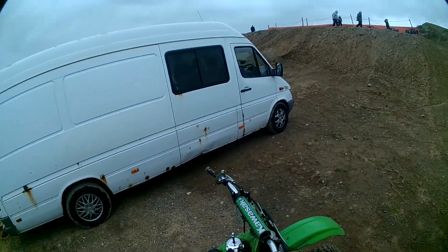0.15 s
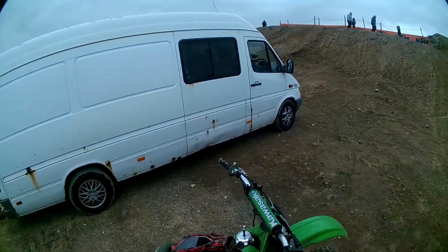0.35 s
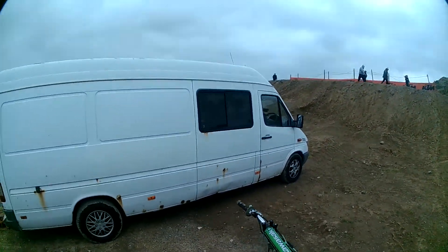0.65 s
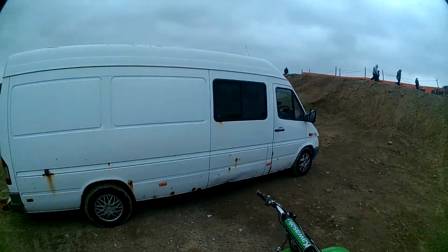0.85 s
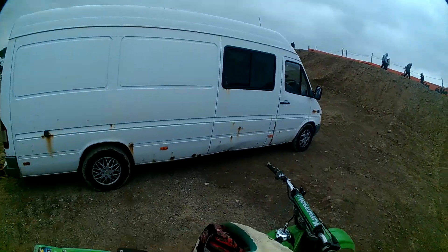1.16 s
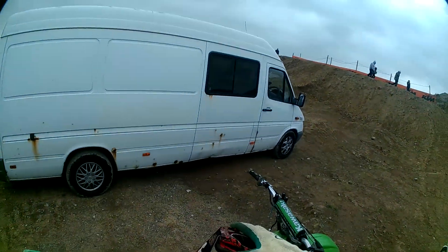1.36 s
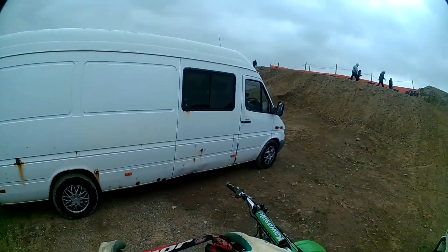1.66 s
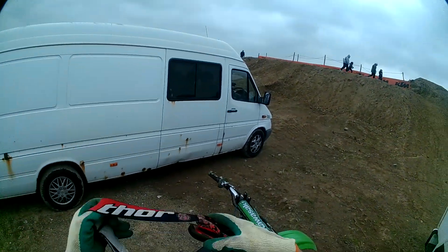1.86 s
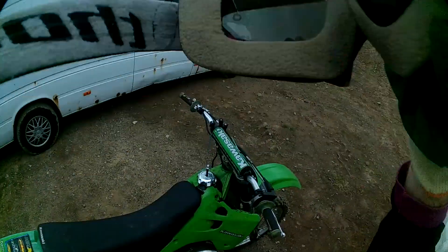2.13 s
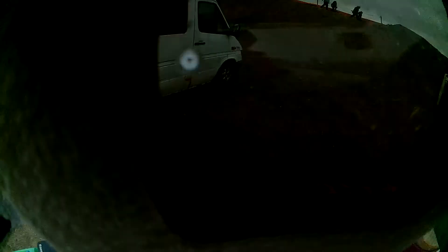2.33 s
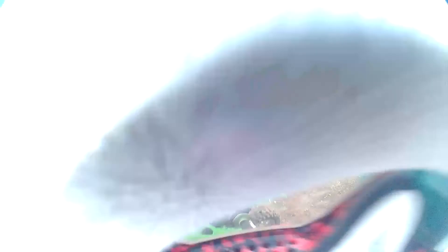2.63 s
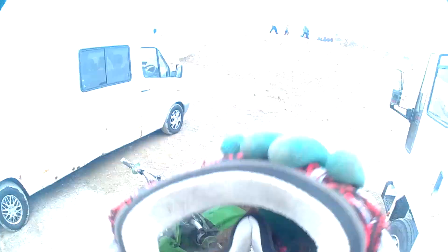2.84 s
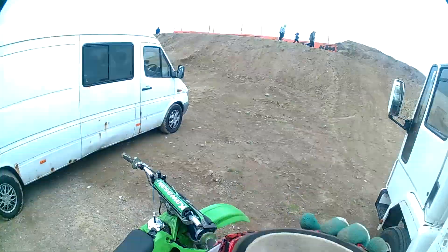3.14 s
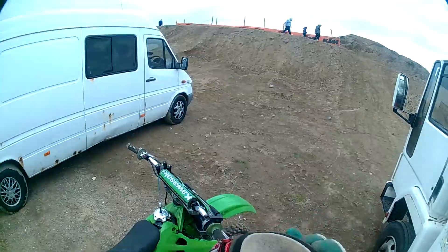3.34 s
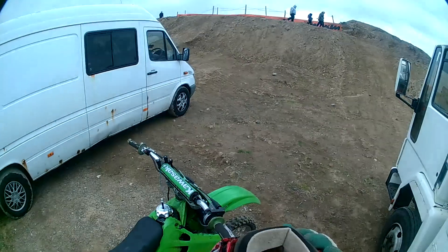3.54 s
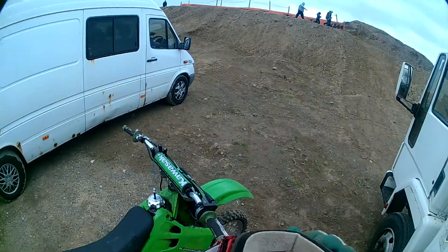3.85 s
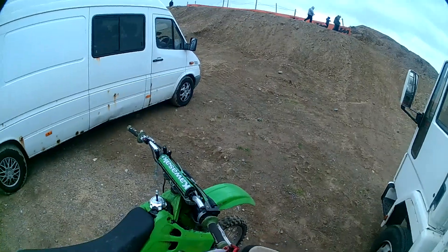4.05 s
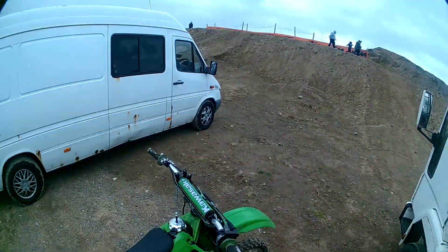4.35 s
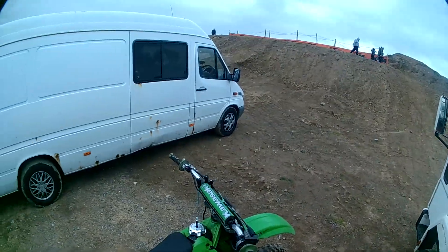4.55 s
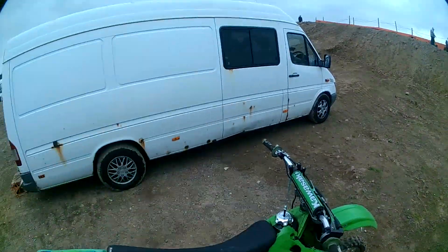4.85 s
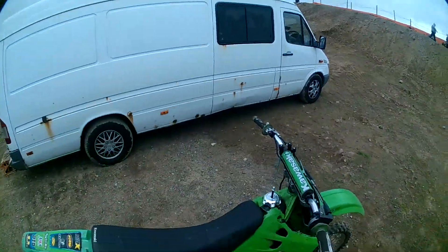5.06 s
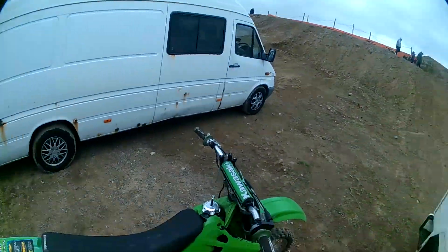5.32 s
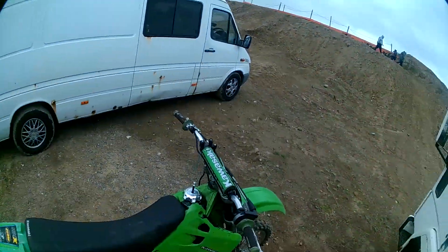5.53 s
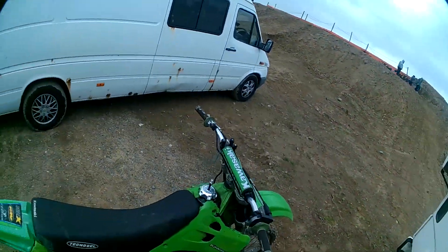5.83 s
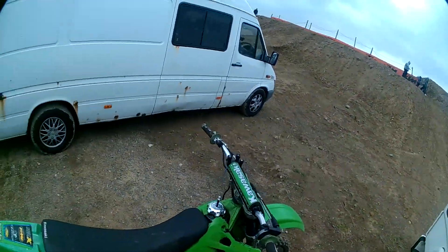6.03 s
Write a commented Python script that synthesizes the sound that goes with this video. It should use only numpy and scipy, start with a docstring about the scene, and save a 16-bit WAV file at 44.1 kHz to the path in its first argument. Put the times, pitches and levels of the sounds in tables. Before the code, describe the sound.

Goggles and gloves knock, rub and squeak against a helmet, close and muffled through a plastic camera case, over a faint breeze.

```python
"""Helmet camera on a quiet hillside

The microphone sits sealed in a plastic case on a helmet. Right at the case, gloves, a strap and
goggles knock, rub and squeak on the shell; the sound comes through the plastic and rings its modes.
Jolts sway the helmet with a low hum. Breeze and a few far chirps lie faintly behind, the air
muffled by the case. The sound cuts out for a few milliseconds under one heavy blow."""
import sys
import numpy as np
from scipy import signal
from scipy.fft import rfft, irfft, next_fast_len
from scipy.io import wavfile
from scipy.ndimage import uniform_filter1d, minimum_filter1d

SR = 44100
rng = np.random.default_rng(int(sys.argv[2]) if len(sys.argv) > 2 else 0)


def waveform_to_disk(signal):
    """Save audio, clipped to [-1, 1], as 16-bit WAV at the path in sys.argv[1]."""
    frames = np.transpose(np.atleast_2d(signal))
    scaled = np.clip(frames, -1, 1) * 32767
    samples = np.round(scaled).astype(np.int16)
    wavfile.write(sys.argv[1], SR, samples)


N = 272979

# modes of shell and case: f/Hz, relative level/dB, t60/s
SHELL_MODES = [(51.1, 11, 0.36), (80, -5.5, 0.11), (101, 1, 0.65), (232, -3, 0.36), (276.9, 6.5, 0.15),
               (332, 13.5, 0.07), (425, -1, 0.12), (483, -3, 0.13), (524, 0.5, 0.075), (733, -4.5, 0.059),
               (848.4, 6, 0.018), (1013, -8, 0.079), (1205, -3, .03), (1390, 9, 0.022), (1500, 8, 0.024),
               (1700, 5, 0.023), (1810, 3, 0.035), (1922, 7.5, 0.023), (2000, -21.5, 0.0092),
               (2596, 14, 0.017), (2970, 3, 0.013), (3474, 8.5, .015), (3720, 11, 0.021),
               (4130, -1.5, 0.027), (4760, -2, 0.01), (6160, -6, 0.02), (8100, -4.5, 0.01), (8650, 2, 0.01),
               (9200, -10, 0.0081), (9400, 6, 0.0085), (10400, 6, 0.006), (13200, -14, 0.0055)]
# edges of the six mode families (helmet sway, boom, body, ring, edge, case tick): f/Hz
FAMILY_EDGES_HZ = [35, 150, 600, 1250, 2350, 4900, 14500]
# blows on the shell: t/s, ring peak/dB, two favoured pitches f/Hz, boom, body and edge/dB re ring,
# contact/ms, damping by the hand/factor on the decay rate
KNOCKS = [(1.865, -33, 870, 1390, -12.5, -3, -30, 6.1, 0.94),
          (1.881, -30.5, 232, 1410, -10.5, -6, -44, 5.2, 0.76),
          (1.915, -44.5, 1010, 1480, -0.5, 7.5, -33.5, 1.66, 0.86),
          (1.931, -32.5, 826, 1360, -20, -6, -30.5, 3.6, 0.93),
          (1.946, -40.5, 1250, 1440, -17, -10, -36, 7.1, 1.1),
          (2.062, -52, 1220, 1360, -7, -6, -29, 3.5, 1.1), (2.152, -18, 1200, 1400, -20, -9, -15, 6.1, 2.3),
          (2.163, -24, 969, 1390, -31, -35, -36, 2.1, 1.05),
          (2.192, -33.5, 1000, 1390, -24, -15, -25, 3.3, 0.54),
          (2.338, -39.5, 705, 1460, -21, -0.5, -26, 3.1, 0.58),
          (2.4, -45, 729, 1330, -30, -6, -40, 1.25, 1.1), (2.574, -39, 1000, 273, -1.5, 1, -24, 5.5, 1.2),
          (2.604, -43.5, 734, 1500, -27, 2.5, -27.5, 3, 0.53),
          (2.889, -37, 890, 1420, -9, -4.5, -31, 2.5, 0.58),
          (2.898, -38, 800, 1440, -6.5, -1, -16.5, 5.2, 1),
          (3.106, -41.5, 840, 1940, -33, 2.5, -30, 5.1, 0.35),
          (3.124, -31.5, 845, 1960, -19, 8.5, -36, 5.6, 0.28),
          (3.142, -44, 853, 2000, -7, -4, -29, 2.8, .8), (3.173, -36, 870, 1880, -19, 1, -34, 3.8, 0.52),
          (3.253, -65, 724, 2000, 12.5, 19, -2, 2, 0.46), (3.631, -41, 799, 1930, -33, 5, -27, 0.91, 1.2),
          (3.656, -48.5, 990, 1700, -26, -22, -10, 2.3, 1.2),
          (3.835, -35.5, 840, 1960, -22, -6.5, -33, 5.7, 0.5),
          (3.867, -34, 960, 1980, -38, -27, -30, 4.2, 1.7),
          (3.884, -13.5, 700, 1990, -35.5, 3, -20, 4.1, 2.4),
          (3.957, -20.5, 869, 1460, -14, -3.5, -30, 2.6, 0.91),
          (3.971, -26, 767, 1810, -17, -7.5, -22, 3.6, 2.4),
          (3.974, -18.5, 810, 1380, -19.5, -0.5, -27, 1.1, 2),
          (3.982, -51, 516, 1600, 27, 19, -32, 2, 3.63), (3.989, -39.5, 660, 1370, -1, 19, -28, 1.45, 2.2),
          (3.997, -46.5, 660, 537, 6, 20, -34, 1.6, 1.9), (4.038, -31.5, 734, 1920, -24, 1, -35, 2.6, .55),
          (4.115, -43, 727, 1810, -3.5, 1.5, -26, 3.2, 1.3),
          (4.186, -36.5, 770, 1370, -9, 3.5, -35.5, 5.9, 1.5),
          (4.223, -41, 810, 1360, -41, 9.5, -33, 2.8, 0.61),
          (4.235, -37, 760, 1310, -22, -3.5, -32, 2.4, 0.36),
          (4.267, -30, 772, 1330, -40, 3.5, -43, 3.3, 1.26), (4.286, -41, 736, 1460, -18, 3.5, -19, 1.3, 1),
          (4.322, -20.5, 1210, 1350, -22, -10.5, -29.5, 2.5, 0.95),
          (4.337, -28, 1260, 1410, -41, -7.5, -29.5, 4.3, 1.7),
          (4.558, -41.5, 758, 1890, -7.5, 2, -24.5, 3.6, 0.72),
          (4.77, -41.5, 1000, 1610, -18, -3, -41, 10.5, 1.8),
          (4.808, -21.5, 940, 1650, -21, -4, -27.5, 2.1, 0.96),
          (4.846, -37.5, 740, 1900, -6.5, 0, -21, 5.7, 2.5), (4.872, -46.5, 668, 1480, 1, 5, -31, 3.3, 2.1),
          (5.106, -35.5, 708, 1470, -35, -15.5, -28, 3.9, 1.2),
          (5.165, -18, 790, 1400, -18, -4, -23, 3.8, 1.2),
          (5.185, -29.5, 880, 1980, -22, -3.5, -30, 2.7, 1.5),
          (5.449, -43.5, 1090, 1710, -19, -23, -46, 1.4, 1.2),
          (5.674, -44, 1010, 1500, -32, 0.5, -27, 2.7, 1.3),
          (5.846, -32, 1070, 1520, -29, -17, -32, 3.9, 1.1),
          (5.866, -37.5, 729, 1530, -14, -12, -24, 4.6, 0.91),
          (5.902, -37.5, 1250, 1330, -17, -7, -31, 2.6, 1.9),
          (5.931, -9, 991, 1700, -40, -16.5, -26.5, 3.65, 1.3),
          (5.95, -21, 1010, 1740, -32, -5, -26, 4.1, 1.6),
          (5.972, -22, 1014, 1390, -23.5, -4, -15, 3.4, 0.99),
          (6.042, -36, 1020, 1500, -10, 3.5, -28, 1.8, 0.98),
          (6.153, -20.5, 960, 1420, -17, -6, -18.5, 4, 1.2)]
# the glove scraping off after a knock: boom, body, ring and edge rms/dB re that family's peak
SCRAPE_OFF_DB = [-11.5, -23.5, -25, -26.5]
# glove and strap strokes: full from t/s, hold/s, rise/s, fall/s, ring rms/dB,
# boom, body and edge/dB re ring
STROKES = [(1.884, 0.067, 0.029, 0.054, -54.5, -1.5, 0, -25.5),
           (2.033, 0.012, 0.051, .12, -69.5, -0.5, -15, -29),
           (2.188, 0.046, 0.018, .06, -48, -17, -3, -13.5),
           (2.333, 0.0075, 0.14, .12, -56.5, -6.5, -0.5, -13.5),
           (2.397, 0.046, 0.11, .06, -58.5, -11, -1.5, -9.5),
           (2.524, 0.059, .08, .15, -48.5, -11.5, -9, -29), (2.602, 0.083, 0.12, .09, -59.5, -3, -9, -9),
           (2.674, 0.11, 0.037, .06, -41.5, -27.5, -5.5, -25),
           (2.797, .04, 0.043, 0.078, -38.5, -20, -13, -19.5),
           (2.927, 0.091, 0.14, .09, -53, -19, -5, -21.5), (3.092, 0.065, 0.036, .12, -49.5, -5.5, -2, -21),
           (3.219, 0.049, .09, .14, -57.5, -9, -6.5, -19), (3.418, 0.012, 0.13, .05, -65.5, -11, 0.5, -22),
           (3.478, .025, .04, .045, -66.5, -2.5, 2, -25), (3.582, 0.059, 0.041, .09, -51.5, -13, -7, -22),
           (3.763, 0.034, 0.088, .09, -56.5, -4, -2.5, -26),
           (3.834, 0.042, 0.026, .09, -38.5, -21.5, -19, -26),
           (3.894, 0.047, 0.026, .08, -42.5, -11.5, -1.5, -21),
           (4.025, 0.017, 0.013, .11, -44, -7.5, -1, -21.5),
           (4.226, 0.0059, 0.091, .09, -44.5, -17, -0.5, -20.5),
           (4.294, 0.049, .05, .05, -70, 8, 18.5, -32), (4.451, 0.11, 0.096, .07, -56.5, -13.5, -0.5, -23),
           (4.643, .14, 0.046, .09, -64.5, -8, 1, -24.5), (4.813, 0.005, 0.028, .12, -42.5, -17, 0, -23),
           (5.007, 0.065, 0.063, .09, -53, -4.5, 2.5, -23.5),
           (5.109, 0.07, 0.11, .08, -43.5, -15, -3, -17.5), (5.248, 0.1, 0.13, .09, -60, -9, -6.5, -16.5),
           (5.443, .01, 0.11, .15, -58.5, -14.5, -6, -20),
           (5.52, 0.17, 0.063, .09, -59.5, -11.5, -6, -21.5), (5.85, .01, 0.09, .09, -54, -18, -5.5, -15.5),
           (5.904, 0.074, 0.073, .06, -47, -3, -9.5, -16), (6.114, 0.073, 0.11, .05, -60.5, -10, -7, -20.5),
           (6.163, 0.011, 0.04, .09, -56, 2, 2, -25)]
# jolts that sway the whole helmet: t/s, rise/s, fall/s, rms level/dB
JOLTS = [(1.885, .015, 0.2, -61), (2.18, .03, 0.065, -64.5), (2.59, 0.13, .25, -79.5),
         (2.872, .2, 0.18, -76), (3.13, 0.14, .08, -76.5), (3.59, .02, 0.19, -62.5), (3.89, .09, .09, -77),
         (3.983, .006, .03, -55), (4.03, .05, 0.16, -63.5), (4.33, .09, .07, -74),
         (4.59, 0.25, 0.11, -77.5), (4.83, 0.062, 0.18, -61.5), (5.17, 0.081, .07, -71),
         (5.35, .2, 0.22, -77.5), (5.57, 0.12, 0.36, -74.5), (5.97, .15, 0.15, -73),
         (6.17, 0.069, 0.18, -68)]
# cloth ticking over the case itself: full from t/s, hold/s, rms level/dB
CASE_DRAGS = [(2.202, .05, -92.5), (2.29, .06, -101), (2.38, 0.083, -94), (2.751, 0.061, -92.5),
              (3.9, .02, -95), (4.042, .04, -94), (4.204, .05, -107), (5.09, .11, -101)]
# short slips of a glove: t/s, length/s, first f/Hz, last f/Hz, level/dB
SQUEAKS = [(3.588, 0.021, 1980, 1900, -42), (3.608, 0.012, 1840, 1700, -52),
           (3.616, 0.017, 1536, 1485, -39), (3.624, 0.024, 2010, 1860, -47.5),
           (3.638, 0.041, 1700, 1773, -47.5), (3.675, .016, 1820, 1910, -47), (4.981, .05, 761, 755, -54),
           (5.038, .03, 748, 730, -39), (5.065, .05, 735, 718, -52.5)]
# far chirps: t/s, f/Hz, peak level/dB, length/ms
CHIRPS = [(.768, 2880, -87, 16), (.803, 2880, -87, 16), (1.268, 2900, -86, 15), (1.301, 2900, -89, 14),
          (1.395, 1305, -61, 32), (1.448, 1330, -63.5, 27), (1.488, 1380, -60.5, 20)]
# outside air as heard within the case: f/Hz, relative spectral level/dB
AIR_SPECTRUM = [(30, -32), (100, -23), (250, -13.5), (450, -7), (750, -0.5), (1250, -4), (1700, -12.5),
                (2500, -27.5), (4000, -42.5), (5500, -57.5)]
# gaps in the sound under a heavy blow: start t/s, end t/s
DROPOUTS = [(3.9805, 3.9832), (3.9862, 3.9897), (3.9957, 3.997)]

TREBLE_CUT_HZ, MUFFLE_HZ = 4880, 3900
TREBLE_CUT = np.vstack([signal.ellip(6, .5, 45, TREBLE_CUT_HZ, fs=SR, output="sos"),
                        signal.butter(6, MUFFLE_HZ, fs=SR, output="sos")])


def knocks(focus_db=11, focus_width=0.077, detune=0.014, scatter_db=1.0,
           thump_db=-32, thump_ms=.8, tick_db=-22):
    """Each blow is a push and a short rattling contact; modes near two pitches of the spot ring most."""
    out, t = np.zeros(N + SR), np.arange(SR // 12) / SR
    hz, db, t60 = np.array(SHELL_MODES).T
    family = np.searchsorted(FAMILY_EDGES_HZ, hz) - 1
    push_age = t * 1000 / thump_ms
    push = (np.e * push_age / 2) ** 2 * np.exp(-push_age) * (1 - push_age / 6.1)
    for start, peak_db, first_hz, second_hz, boom_db, body_db, edge_db, contact_ms, damping in KNOCKS:
        span = slice(int(start * SR), int(start * SR) + len(t))
        mistuning, scatter = rng.standard_normal((2, len(hz)))
        pitch = hz * (1 + detune * mistuning)
        nearness = sum(np.exp(-(np.log(hz / spot) / focus_width) ** 2) for spot in (first_hz, second_hz))
        gain = undb(db + scatter_db * scatter + focus_db * nearness)
        decay = np.exp(-np.log(1000) * max(damping, .4) * t / t60[:, None])
        modes = gain[:, None] * np.sin(2 * np.pi * np.outer(pitch, t)) * decay
        contact_age = np.arange(1024) / (contact_ms * SR / 1000)
        contact = rng.standard_normal(1024) * np.sqrt(contact_age) * np.exp(-2 * contact_age ** 2)
        out[span] += np.sign(mistuning[0]) * push * undb(peak_db + thump_db)  # random polarity
        # the sharper the edge of a knock, the more the case ticks
        for k, share_db in enumerate([boom_db, body_db, 0, edge_db, edge_db + tick_db], 1):
            struck = signal.fftconvolve(modes[family == k].sum(axis=0), contact)[:len(t)]
            heard = family_band(struck, k)
            out[span] += heard / np.abs(heard).max() * undb(peak_db + share_db)
    return out[:N]


def rubbing(slips_per_s=2400, scatter_db=0.98, friction_noise=0.63, burst_db=2.0, wander_db=2.5,
            shell_damping=1.13, tick_damping=1.8):
    """Cloth and foam stick and slip on the shell: dense soft clicks in bursts; the spot rubbed wanders."""
    slipping = rng.random(N) < slips_per_s / SR
    slips = slipping * undb(scatter_db * rng.exponential(size=N)) * rng.standard_normal(N)
    force = at_level(slips, 0) + friction_noise * rng.standard_normal(N)
    force *= undb(burst_db * wander(60))
    families = np.zeros((6, N))
    for hz, db, t60 in SHELL_MODES:
        k = np.searchsorted(FAMILY_EDGES_HZ, hz) - 1
        if k > 0:
            damping = shell_damping if hz < TREBLE_CUT_HZ else tick_damping  # from the pressing hand
            drive = force * undb(wander_db * wander(30))
            families[k] += at_level(ring_mode(drive, hz, t60 / damping), db)
    return sum(at_level(family_band(families[k], k), 0) * gain
               for k, gain in enumerate(rubbing_pressure(), 1))


def rubbing_pressure(scrape_fall_s=.035, drag_fade_s=.04):
    """Rms gains from boom to tick: strokes and scrapes press on the shell, drags on the case."""
    start, hold, rise, fall, *stroke_db = np.transpose(STROKES)
    strokes = swells(start, hold, rise, fall, family_levels(*stroke_db))
    start, ring_db, _, _, boom_db, body_db, edge_db, contact_ms, _ = np.transpose(KNOCKS)
    contact_s = contact_ms / 1000
    scrape_db = family_levels(ring_db, boom_db, body_db, edge_db) + SCRAPE_OFF_DB
    scrapes = swells(start + contact_s, 0, contact_s, scrape_fall_s, scrape_db)
    start, hold, drag_db = np.transpose(CASE_DRAGS)
    drags = swells(start, hold, drag_fade_s, drag_fade_s, drag_db)
    return list(np.hypot(strokes, scrapes)) + drags


def helmet_sway(waver=0.033, flutter_db=3.5):
    """The lowest modes ring on, a little unsteady, after each jolt."""
    start, rise, fall, jolt_db = np.transpose(JOLTS)
    envelope = swells(start, 0, rise, fall, jolt_db)[0]
    tones = np.zeros(N)
    for hz, db, _ in SHELL_MODES:
        if hz < FAMILY_EDGES_HZ[1]:
            gain = undb(db + flutter_db * wander(9.4))
            pitch = hz * (1 + waver * wander(12))
            tones += gain * np.sin(2 * np.pi * np.cumsum(pitch) / SR)
    return family_band(at_level(tones, 0) * envelope, 0)


def glove_squeaks(waver=.02, flutter_db=3, fade_share=0.28):
    """Near-regular stick-slip on the shell: wavering, fluttering tones that glide."""
    out = np.zeros(N)
    drift = 1 + waver * wander(150)
    flutter = undb(flutter_db * wander(120))
    for start, length, first_hz, last_hz, db in SQUEAKS:
        span = np.arange(int(start * SR), int((start + length) * SR))
        progress = np.linspace(0, 1, len(span))
        pitch = (first_hz + (last_hz - first_hz) * progress) * drift[span]
        tone = np.sqrt(2) * np.sin(2 * np.pi * np.cumsum(pitch) / SR)
        envelope = np.minimum(np.minimum(progress, 1 - progress) / fade_share, 1)
        out[span] += tone * undb(db) * flutter[span] * envelope
    return out


def far_chirps():
    """Short soft tones from far off, each under a bell-shaped envelope."""
    out, t = np.zeros(N), np.arange(-SR // 20, SR // 20) / SR
    for centre, hz, db, length_ms in CHIRPS:
        envelope = np.exp(-2 * (t * 2000 / length_ms) ** 2)
        first = int(centre * SR) - SR // 20
        out[first:first + len(t)] += undb(db) * np.sin(2 * np.pi * hz * t) * envelope
    return out


def hillside_air(rms_db=-65.5, swell_db=.4, flicker_db=.9):
    """Breeze and distant noise, muffled by the case; half-octave bands swell together, flicker alone."""
    size = next_fast_len(N)
    out, swell = np.zeros(N), wander(0.86)
    hz = np.fft.rfftfreq(size, 1 / SR) + 1
    air_hz, air_db = np.transpose(AIR_SPECTRUM)
    colour = undb(np.interp(np.log(hz), np.log(air_hz), air_db, left=-60, right=-90))
    spectrum = rfft(rng.standard_normal(size)) * colour
    for octave in np.arange(4.5, 13, .5):
        band = np.clip(1 - 2 * np.abs(np.log2(hz) - octave), 0, 1)
        out += irfft(spectrum * band, size)[:N] * undb(swell_db * swell + flicker_db * wander(7.5))
    return at_level(out, rms_db)


def family_band(x, family):
    """Each family keeps to its band; all but the ticks are muffled and cut off steeply near 4.9 kHz."""
    band = signal.butter(4, FAMILY_EDGES_HZ[family:family + 2], "bandpass", fs=SR, output="sos")
    passed = signal.sosfilt(band, x)
    return passed if FAMILY_EDGES_HZ[family] > TREBLE_CUT_HZ else signal.sosfilt(TREBLE_CUT, passed)


def ring_mode(force, hz, t60):
    """One damped mode driven by a force."""
    pole = np.exp(2j * np.pi * hz / SR - np.log(1000) / (t60 * SR))
    return signal.lfilter([1], [1, -pole], force).imag


def swells(start, hold, rise, fall, db):
    """Rms gain of overlapping swells, one per column of db; rise and fall span 20 dB, powers add."""
    t = np.arange(0, N / SR + .002, .001)
    start, hold, rise, fall = (np.reshape(v, (-1, 1)) for v in (start, hold, rise, fall))
    before = np.maximum(start - t, 0) / np.maximum(rise, .002)
    after = np.maximum(t - start - hold, 0) / np.maximum(fall, .002)
    powers = undb(2 * np.reshape(db, (len(start), -1))).T @ 100. ** -(before + after)
    return [np.interp(np.arange(N) / SR, t, np.sqrt(power)) for power in powers]


def family_levels(ring_db, boom_db, body_db, edge_db):
    """Levels of boom, body, ring and edge, from the ring's level and the offsets to it."""
    return np.transpose([ring_db + boom_db, ring_db + body_db, ring_db, ring_db + edge_db])


def wander(rate_hz):
    """Random values held for 1 / rate_hz seconds and smoothed twice; spread near 1."""
    hold = int(SR / rate_hz)
    steps = np.repeat(rng.standard_normal(N // hold + 1), hold)
    return 1.77 * uniform_filter1d(uniform_filter1d(steps, hold), hold)[:N]


def at_level(x, db):
    """Scale to an rms level."""
    return x * undb(db) / np.sqrt(np.mean(x ** 2))


def undb(db):
    """Decibels to amplitude."""
    return 10 ** (np.asarray(db) / 20)


def scene():
    """One microphone in the case: handling right against it, the hillside far behind."""
    return (knocks() + rubbing() + helmet_sway() + glove_squeaks() + far_chirps() + hillside_air())[None]


def record(dry, limit=0.18, hiss_db=-97, top_hz=15600):
    """Brief dropouts, a fast peak limiter, faint preamplifier hiss rising to the treble; the top is cut."""
    t = np.arange(N) / SR
    gaps = sum((t > start) & (t < end) for start, end in DROPOUTS)
    passing = uniform_filter1d(1. - gaps, 45)  # 1 ms edges
    allowed_gain = np.minimum(1, limit / (np.abs(dry) + 1e-9))
    limiter_gain = uniform_filter1d(minimum_filter1d(allowed_gain, 90), 90)  # 2 ms windows
    hiss = at_level(signal.lfilter([1, -.5], [1], rng.standard_normal(N)), hiss_db)
    top_cut = signal.ellip(10, .2, 70, top_hz, fs=SR, output="sos")
    return signal.sosfilt(top_cut, dry * limiter_gain * passing + hiss)


dry = scene()
out = record(dry)
waveform_to_disk(out)
```